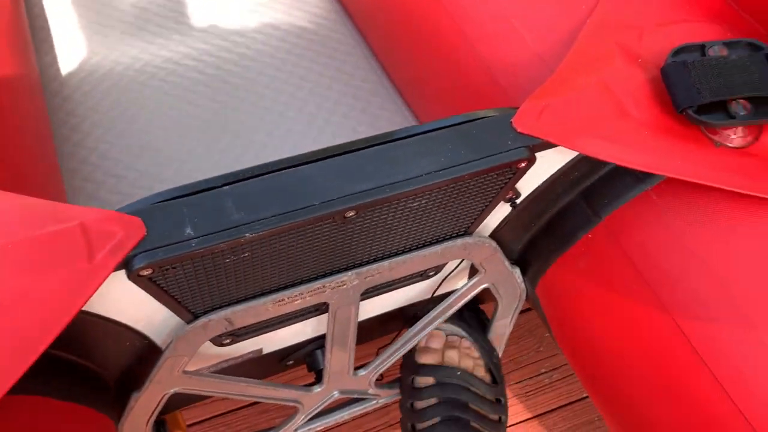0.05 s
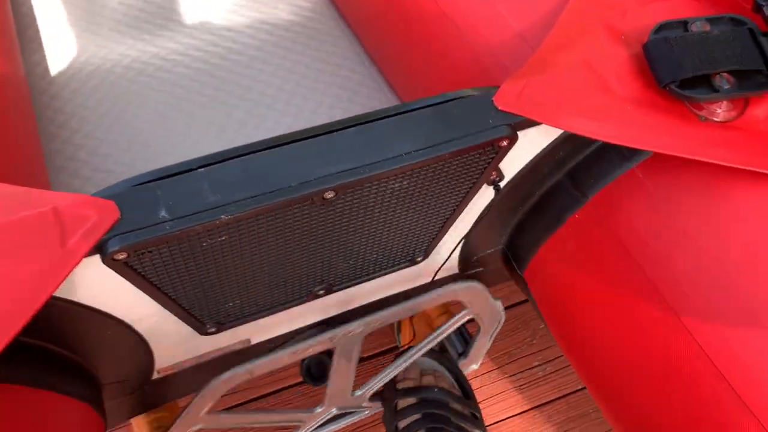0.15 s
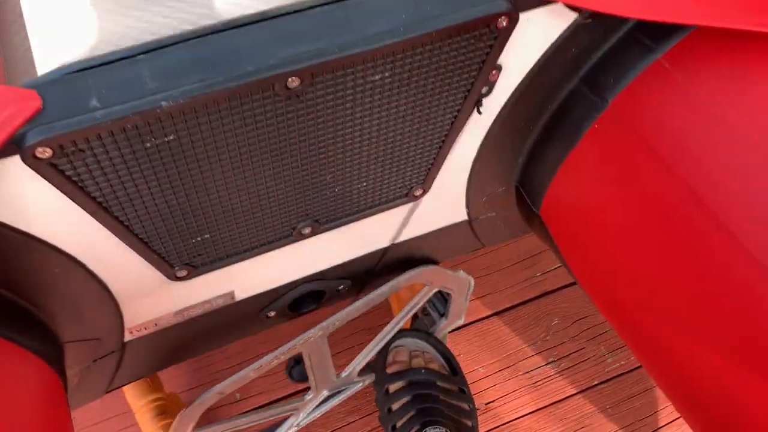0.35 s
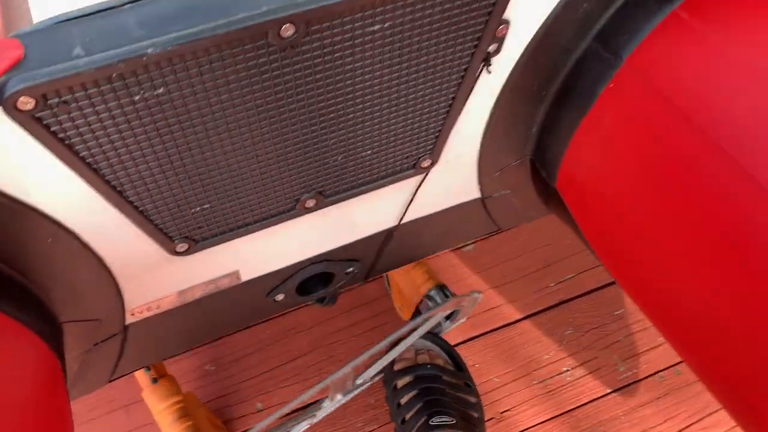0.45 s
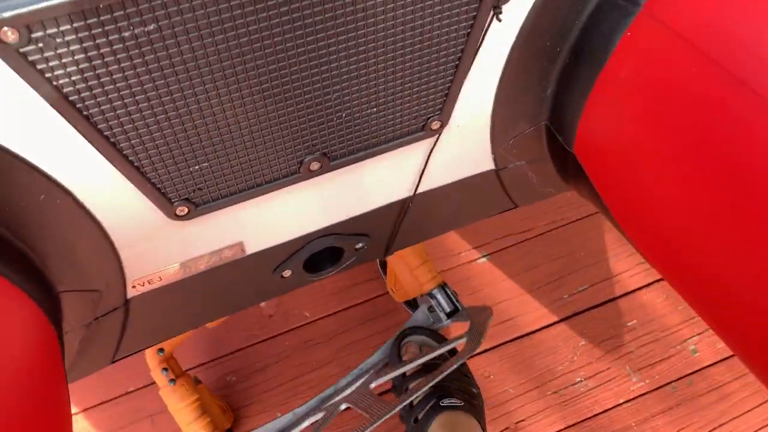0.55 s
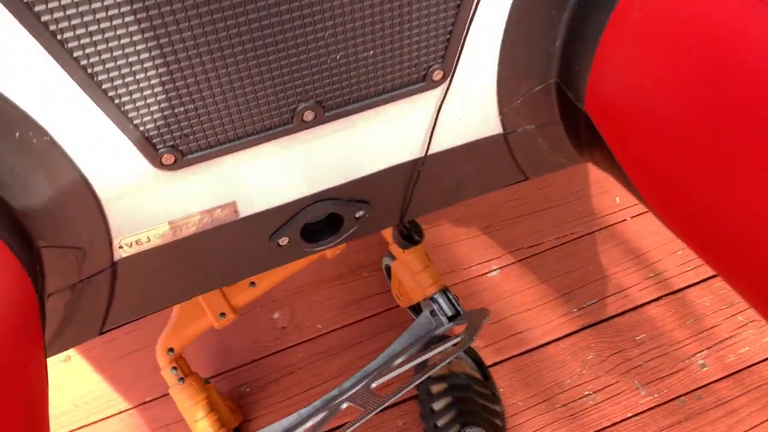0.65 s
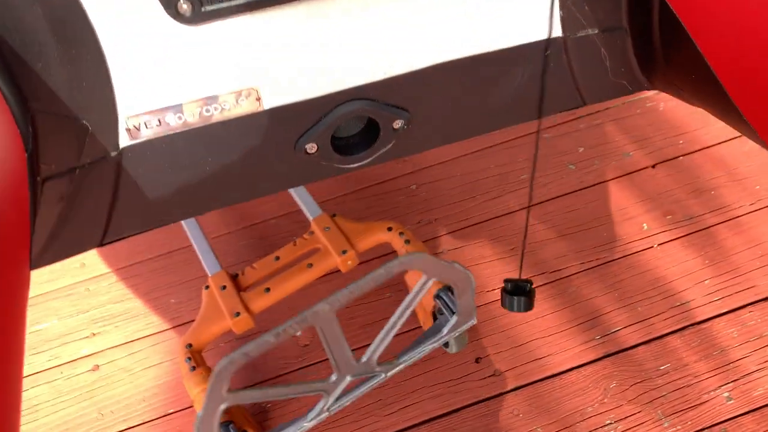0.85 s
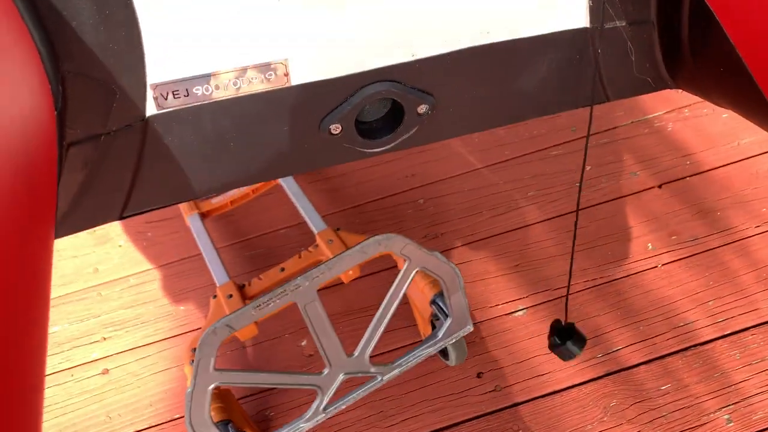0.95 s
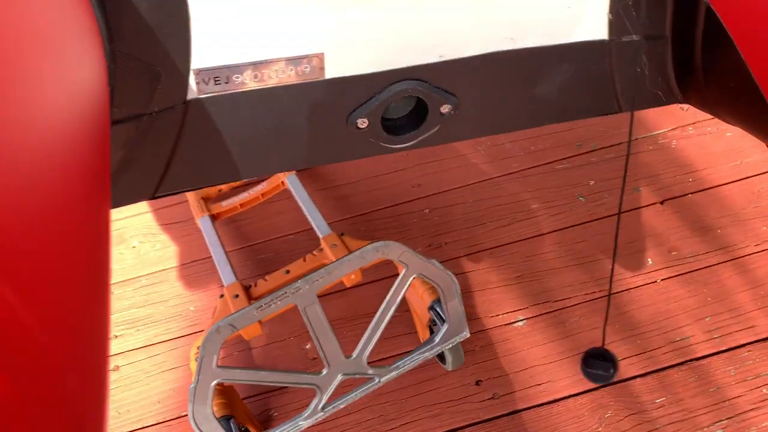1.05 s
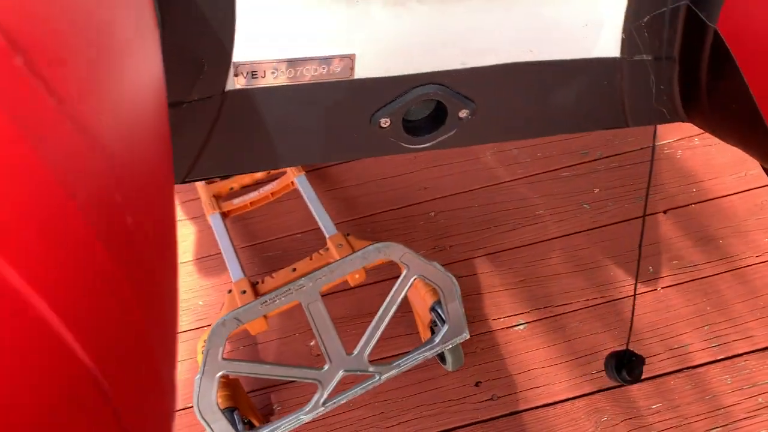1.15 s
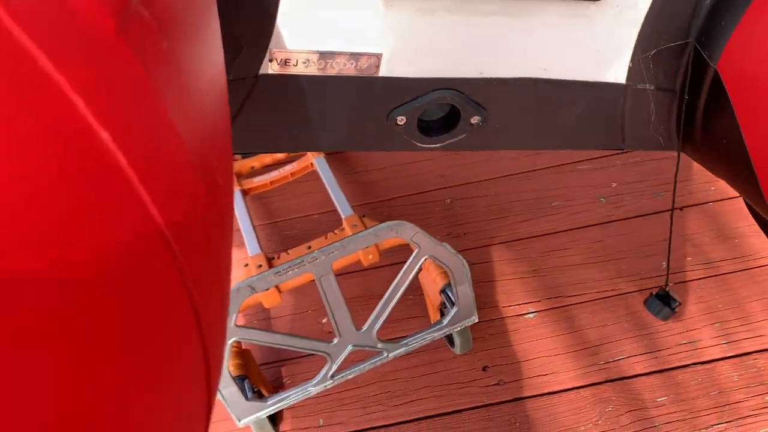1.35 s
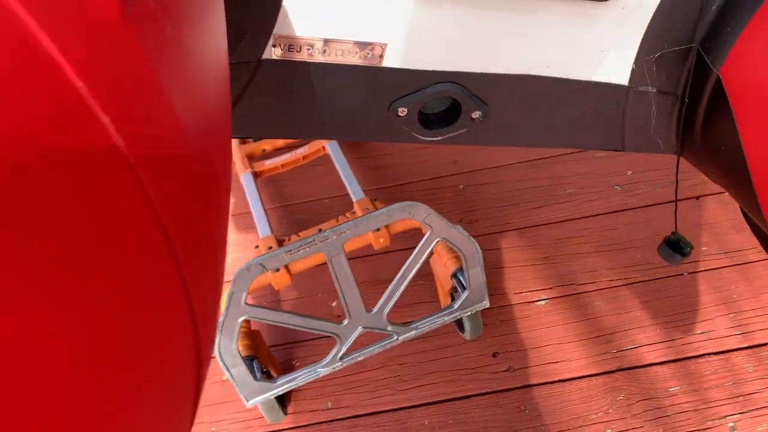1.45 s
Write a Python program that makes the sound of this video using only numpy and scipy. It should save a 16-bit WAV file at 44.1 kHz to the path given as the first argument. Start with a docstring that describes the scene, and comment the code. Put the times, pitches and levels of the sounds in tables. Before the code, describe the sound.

Two close bursts of clatter come from a metal hand cart outdoors: first it knocks against a booming boat hull, then, after a short scrape and rattle, it lands flat on wooden planks and settles with faint ticks.

```python
"""A wooden deck below a boat's stern. A folding aluminium hand cart slips off, bumps down the hull
and drops flat. Each knock is a crack, a short clack and a ring of the frame; hull and planks thump
and boom underneath. Between the crashes the cart scrapes, rattles and rolls; it squeaks once as it
settles. Behind it: quiet outdoor air and a faint hum."""
import sys
import numpy as np
from scipy import signal
from scipy.fft import rfft, irfft
from scipy.io import wavfile
from scipy.ndimage import uniform_filter1d

SR = 44100
rng = np.random.default_rng(int(sys.argv[2]) if len(sys.argv) > 2 else 0)


def to_wav(sig):
    """Store sig (one row per channel, or 1-D mono) as 16-bit WAV at the path in sys.argv[1].

    Samples outside -1..1 are clipped; the rate is SR.
    """
    pcm = np.clip(np.atleast_2d(sig), -1, 1) * 32767
    pcm = np.round(pcm).astype(np.int16)
    wavfile.write(sys.argv[1], SR, pcm.T)  # frames by channels


N = 66150
EVENT_T = np.arange(int(.7 * SR)) / SR  # time axis of one event, s

# Spectrum of struck aluminium. Each row: frequency in Hz, relative density in dB.
METAL_SPECTRUM = [(300, -23.5), (680, -2.5), (1000, -1.5), (2000, -1), (3300, -2), (5000, -3), (8000, -9),
                  (11000, -13.5), (16000, -16)]


def amp(db):
    """Decibels to gain."""
    return 10 ** (np.asarray(db) / 20)


def unit(x):
    """Scale to rms 1."""
    return x / np.sqrt(np.mean(x ** 2) + 1e-20)


def read(points, hz):
    """Interpolate a table over log frequency."""
    table_hz, value = np.transpose(points)
    return np.interp(np.log(hz + 1), np.log(table_hz + 1), value)


def add(mix, start_s, sound):
    """Mix a sound in at start_s."""
    part = mix[max(round(start_s * SR), 0):][:len(sound)]
    part += sound[:len(part)]


def noise(spectrum, tilt_db_oct=0, n=len(EVENT_T)):
    """Coloured noise at rms 1; the tilt pivots at 3 kHz and levels off below 500 Hz."""
    hz = np.fft.rfftfreq(n, 1 / SR)
    octaves = np.log2(np.maximum(hz, 500) / 3000)
    gain = amp(read(spectrum, hz) + tilt_db_oct * octaves)
    return unit(irfft(rfft(rng.standard_normal(n)) * gain, n))


def fade(t60_s, rise_s=0):
    """Quick rise, exponential decay."""
    return np.exp(-np.log(1000) * EVENT_T / t60_s) * (1 - np.exp(-EVENT_T / (rise_s + 1e-4)))


def ring(modes, spread_db=0):
    """Decaying modes; a random level spread stands for the spot struck."""
    return sum(amp(db + spread_db * rng.standard_normal()) * fade(t60_s)
               * np.sin(2 * np.pi * hz * EVENT_T) for hz, db, t60_s in modes)


def outdoors(air_db=-47.5, air_fall_db_per_s=2, hum_rise_db_per_s=4.5):
    """Air slowly recedes while a faint distant hum grows."""
    # Each row: frequency in Hz, relative density in dB.
    air_spectrum = [(20, -14), (60, 2), (130, -10.5), (215, -1), (290, -7), (520, -12.5), (2300, -23),
                    (5000, -27), (10000, -36), (16000, -39)]
    # Each row: frequency in Hz, rms level at mid-scene in dB.
    hum_tones = [(119, -58), (290.7, -52.5)]
    t = (np.arange(N) - N / 2) / SR  # s from mid-scene
    hum = sum(amp(db) * np.sqrt(2) * np.sin(2 * np.pi * (hz * t + rng.random())) for hz, db in hum_tones)
    air = amp(air_db - air_fall_db_per_s * t) * noise(air_spectrum, n=N)
    return air + hum * amp(hum_rise_db_per_s * t)


def rolling():
    """Wheels rumble over the planks between the two crashes."""
    # Each row: time in seconds, level in dB.
    roll_levels = [(.38, -33.5), (.48, -40), (.57, -49), (.63, -36), (.73, -38), (.8, -47), (.92, -52)]
    # Each row: frequency in Hz, relative density in dB.
    roll_spectrum = [(25, -15), (48, -3.5), (75, 1), (110, -4), (190, -3), (290, -19.5), (2000, -49)]
    times_s, db = np.transpose(roll_levels)
    level = np.interp(np.arange(N) / SR, times_s, amp(db), left=0, right=0)
    return uniform_filter1d(level, size=900) * noise(roll_spectrum, n=N)


def squeak(start_s=1.105, length_s=.025, from_hz=660, to_hz=1330, gain_db=-40.5):
    """A brief rising squeak as the cart settles."""
    out = np.zeros(N)
    progress = np.arange(0, 1, 1 / (length_s * SR))
    cycles = np.cumsum(from_hz + (to_hz - from_hz) * progress) / SR
    envelope = np.sqrt(abs(np.sin(np.pi * progress))) * (1 - progress / 2)
    add(out, start_s, amp(gain_db) * envelope * np.sin(2 * np.pi * cycles))
    return out


def clinking(x, depth_db=3.5, width_hz=450, length_s=.012):
    """Loose parts sound in turn: short narrow patches come and go across the spectrum."""
    size, hop = 256, 64
    bins = signal.stft(x, SR, nperseg=size, noverlap=size - hop)[2]
    patch = np.outer(np.hanning(2 * width_hz * size // SR + 2), np.hanning(int(2 * length_s * SR / hop)))
    flicker = unit(signal.fftconvolve(rng.standard_normal(bins.shape), patch, "same"))
    clinks = signal.istft(bins * amp(depth_db * flicker), SR, nperseg=size, noverlap=size - hop)[1]
    return unit(clinks[:len(x)])


def scrapes(rise_s=.0048):
    """Sliding contacts: gritty hiss that starts quickly and eases off."""
    # Each row: start in seconds, length in seconds, level in dB, tilt in dB per octave.
    slides = [(0.094, 0.046, -35, 4.5), (0.133, 0.3, -38, -2), (0.15, 0.018, -33, -2),
              (0.272, 0.11, -29, 14), (0.325, 0.092, -33.5, -0.5), (0.608, 0.039, -38.5, -2.5),
              (.672, 0.059, -42, -3), (0.8918, 0.059, -36, 3.5), (0.916, 0.037, -34.5, 1.5),
              (1.031, 0.32, -56, -4), (1.335, 0.049, -50.5, -1.5)]
    # Each row: frequency in Hz, relative density in dB.
    scrape_spectrum = [(200, 6), (700, 2.5), (2900, 2), (8000, -3), (13000, -6.5), (16000, -11)]
    out = np.zeros(N)
    for start_s, length_s, db, tilt_db_oct in slides:
        stroke = np.minimum(EVENT_T / rise_s, 1) * np.maximum(1 - (EVENT_T / length_s) ** 2, 0)
        add(out, start_s, amp(db) * stroke * clinking(noise(scrape_spectrum, tilt_db_oct)))
    return out


def thumps(blows, modes, wash_spectrum, wash_db, wash_t60_s):
    """Each blow gives a damped local thump and a whole-body boom: modes plus a wash of noise."""
    out = np.zeros(N)
    for start_s, thump_db, hz, t60_s, boom_db in blows:
        thump = amp(thump_db) * np.sin(2 * np.pi * hz * EVENT_T) * fade(t60_s, rise_s=.0016)
        boom = ring(modes) + amp(wash_db) * noise(wash_spectrum) * fade(wash_t60_s, rise_s=.0034)
        add(out, start_s, thump + amp(boom_db) * boom)
    return out


def hull():
    """The hull booms as the cart bumps down it."""
    # Each row: start in seconds, thump level in dB, pitch in Hz, t60 in seconds, boom level in dB.
    bumps = [(.054, -24.5, 255, 0.038, -44.5), (.1385, -13, 382, 0.0093, -68), (.165, -16, 826, 0.013, -42),
             (.209, -21, 189, 0.12, -25), (.229, -2, 153, 0.035, -20.5), (.2628, -1, 509, .022, -38),
             (.3222, -3, 485, .023, -38), (.284, -7.5, 121, 0.028, -20), (.331, -15, 133.6, 0.1, -21.5),
             (.486, -30.5, 170, 0.1, -40)]
    # Each row: frequency in Hz, level in dB, t60 in seconds.
    hull_modes = [(52, -9, 0.84), (133.3, -1, 0.46), (161.7, -8.5, 0.25), (220.3, -1.5, 0.58),
                  (388, -6.5, 0.34), (418.6, -2.5, 0.16), (480, -12.5, 0.21), (553, -3, 0.11),
                  (624, -11.5, 0.15)]
    # Each row: frequency in Hz, relative density in dB.
    wash_spectrum = [(25, -10), (55, -1), (130, -3), (220, 4), (300, -10.5), (560, -6), (2000, -55)]
    return thumps(bumps, hull_modes, wash_spectrum, wash_db=.5, wash_t60_s=.28)


def deck():
    """The planks boom as the cart drops flat."""
    # Each row: start in seconds, thump level in dB, pitch in Hz, t60 in seconds, boom level in dB.
    blows = [(.961, -25, 277, 0.062, -28), (.974, -13.5, 225.4, 0.22, -31.5),
             (1.0255, -13, 319, 0.064, -28.5), (1.081, -21.5, 227, 0.18, -39),
             (1.375, -35, 125, 0.047, -47.5)]
    # Each row: frequency in Hz, level in dB, t60 in seconds.
    plank_modes = [(130.5, -1.5, 0.34), (237, -16, 0.66), (288, -3.5, 0.35), (371, -5.5, 0.27),
                   (457.3, -1, 0.17)]
    # Each row: frequency in Hz, relative density in dB.
    wash_spectrum = [(25, -7), (60, -1.5), (130, -5.5), (250, 1), (450, -5.5), (700, -21.5), (2500, -37.5)]
    return thumps(blows, plank_modes, wash_spectrum, wash_db=4.5, wash_t60_s=.3)


def shimmer(tilt_db_oct):
    """Dense modes of the frame and its loose parts, as noise that dies faster in the treble."""
    # Each row: frequency in Hz, t60 in seconds.
    decay_times = [(300, 0.47), (5000, 0.18), (16000, 0.24)]
    hz, t, bins = signal.stft(clinking(noise(METAL_SPECTRUM, tilt_db_oct)), SR, nperseg=256)
    decay = np.exp(-np.log(1000) * t / read(decay_times, hz)[:, None])
    return signal.istft(bins * decay, SR, nperseg=256)[1][:len(EVENT_T)]


def chatter(depth=.4):
    """Loose joints shake the level of a ringing part."""
    shake = unit(uniform_filter1d(rng.standard_normal(len(EVENT_T)), size=130))
    return (1 + depth * shake) / np.hypot(1, depth)


def clack(centre_hz, spread=.13):
    """The struck part answers with a short cluster of close modes."""
    envelope = fade(t60_s=.022, rise_s=.0002)
    modes_hz = centre_hz * (1 + np.linspace(-spread, spread, num=7))
    cluster = envelope * sum(np.sin(2 * np.pi * (hz * EVENT_T + rng.random())) for hz in modes_hz)
    return cluster * np.linalg.norm(envelope) / np.linalg.norm(cluster) / np.sqrt(2)  # one mode's energy


def knocks(modes_db=-7):
    """Each knock cracks, clacks at the struck part and sets the aluminium frame ringing."""
    # Each row: start in seconds, crack level in dB, crack t60 in seconds, tilt in dB per octave,
    # frame level in dB, clack pitch in Hz, clack level in dB.
    hits = [(.061, -38.5, 0.03, 0, -53, 980, -31.5), (.1638, -18, 0.01, -2, -61, 2320, -42),
            (.2069, -13.5, .022, 1, -29, 1970, -3), (.2098, -17.5, .03, 0, -28, 860, -13),
            (0.2209, -21, 0.074, 2, -27.5, 6100, -19), (0.2617, -13.5, 0.038, 2.5, -31.5, 2250, -11),
            (0.2771, -26, 0.036, 0, -31, 4600, -21), (0.3217, -25, 0.054, 1, -33.5, 2120, -18.5),
            (0.3695, -48, .05, 5.5, -34.5, 4470, -31), (0.397, -27, 0.055, 1.5, -48, 4370, -28),
            (0.485, -36.5, 0.021, 6, -66, 8380, -46), (.573, -49.5, .05, -3.5, -49, 3000, -36),
            (.620, -26.5, 0.037, 3, -41, 1526, -26), (.659, -34, 0.058, 0.5, -59, 1400, -26.5),
            (.9556, -15, .098, 4, -27, 1620, -7), (.9575, -20, .02, 0, -33, 2600, -13),
            (.9593, -12, .021, -2, -30, 1050, -8.5), (.974, -34, 0.043, -6, -29.5, 1780, -17.5),
            (1.022, -23.5, 0.021, -3, -40, 2590, -25), (1.0252, -19, 0.05, 1, -33.5, 2560, -16.5),
            (1.0601, -33, 0.026, -2, -60, 2540, -27), (1.067, -28.5, 0.054, 2, -50, 3520, -44),
            (1.371, -39, 0.031, 1, -70, 3900, -36), (1.3977, -37.5, 0.016, 1, -70, 2000, -32)]
    # Each row: frequency in Hz, level in dB, t60 in seconds.
    frame_modes = [(997, 0.5, 0.06), (1400, -4, 0.098), (1607, 0, 0.17), (1855, -1.5, .2), (2134, -7, 0.21),
                   (2562, 5, 0.11), (4480, 3, 0.1), (5421, -1, 0.099), (6314, 1, 0.073)]
    out = np.zeros(N)
    for start_s, crack_db, t60_s, tilt_db_oct, frame_db, clack_hz, clack_db in hits:
        crack = amp(crack_db) * noise(METAL_SPECTRUM, tilt_db_oct) * fade(t60_s)
        frame = shimmer(tilt_db_oct) + amp(modes_db) * ring(frame_modes, spread_db=4.5) * chatter()
        add(out, start_s, crack + amp(clack_db) * clack(clack_hz) + amp(frame_db) * frame)
    return out


def scene():
    """Hull, deck, cart and air in mono."""
    return (hull() + deck() + knocks() + rolling() + scrapes() + squeak() + outdoors())[None]


def record(dry, low_cut_hz=37.2, ceiling=.7, high_cut_hz=15900):
    """High-pass, soft clip, low-pass."""
    dry = signal.sosfilt(signal.butter(2, low_cut_hz, "high", fs=SR, output="sos"), dry)
    rounded = dry / (1 + (dry / ceiling) ** 4) ** .25
    low_pass = signal.firwin(255, high_cut_hz, window=("kaiser", 9), fs=SR)
    return signal.oaconvolve(rounded, low_pass[None], "same")


dry = scene()
out = record(dry)
to_wav(out)
```